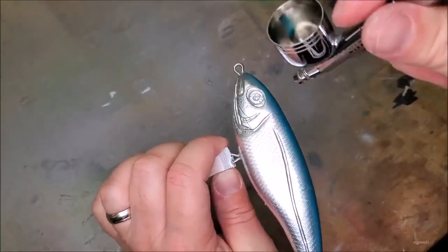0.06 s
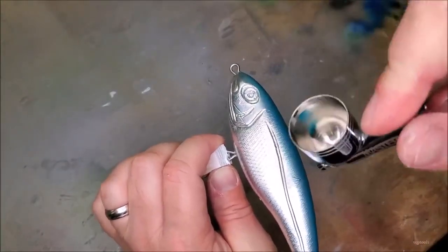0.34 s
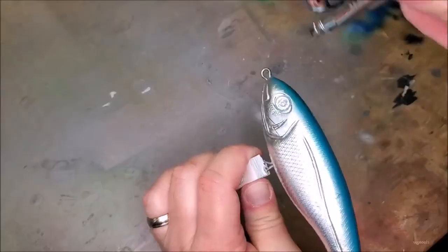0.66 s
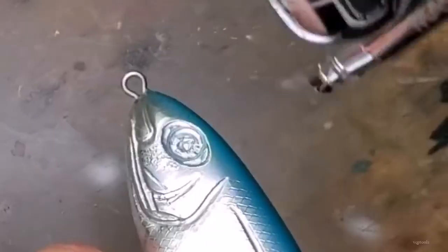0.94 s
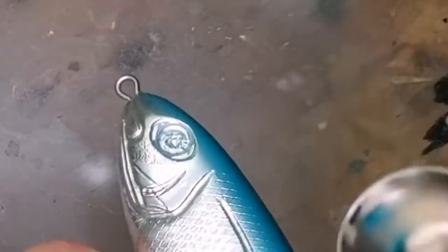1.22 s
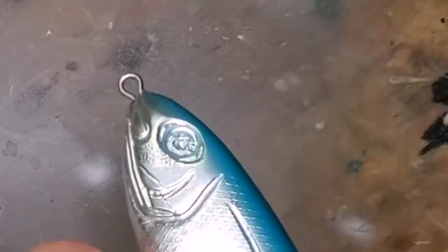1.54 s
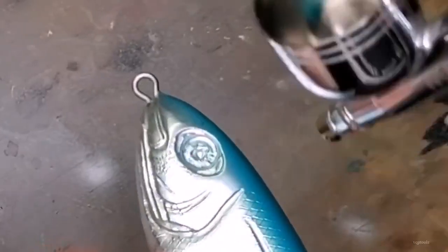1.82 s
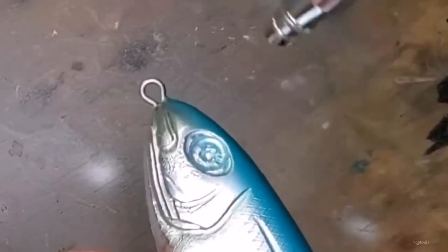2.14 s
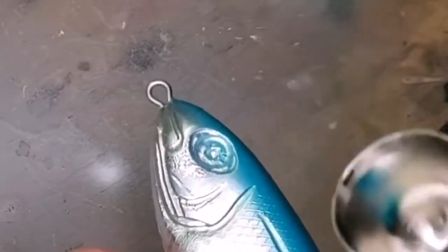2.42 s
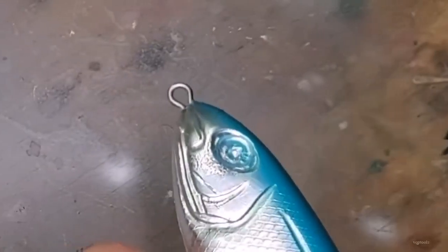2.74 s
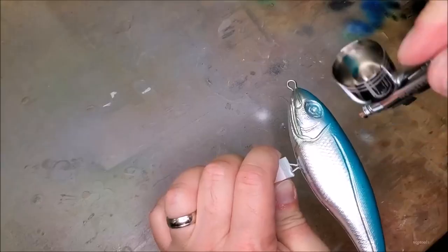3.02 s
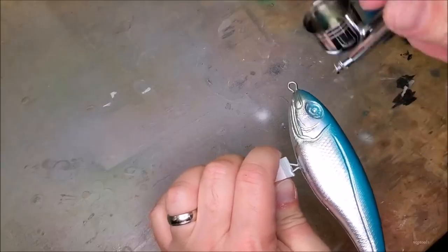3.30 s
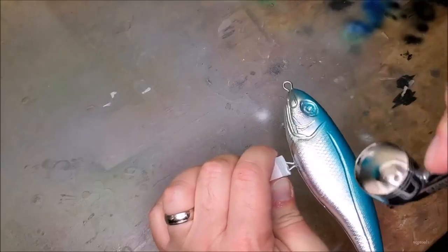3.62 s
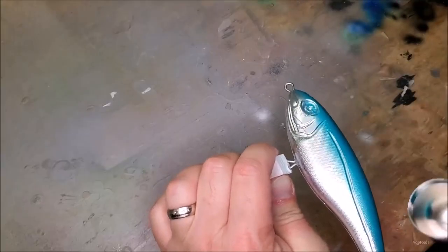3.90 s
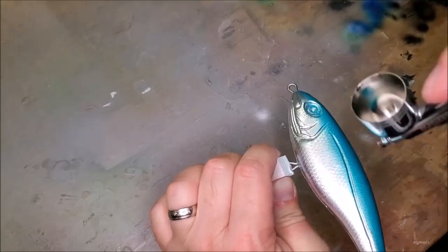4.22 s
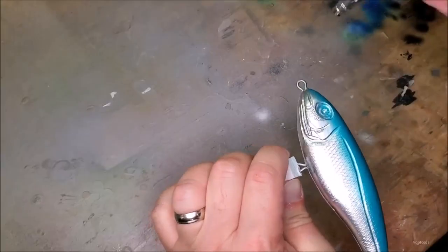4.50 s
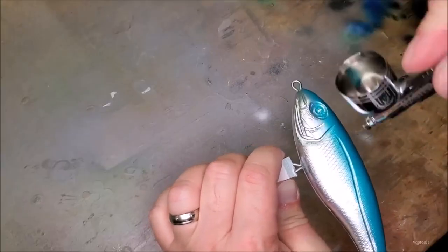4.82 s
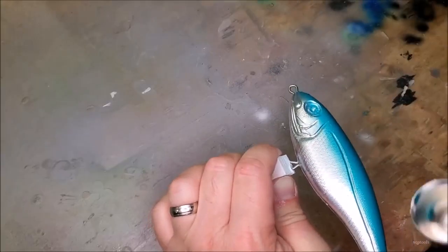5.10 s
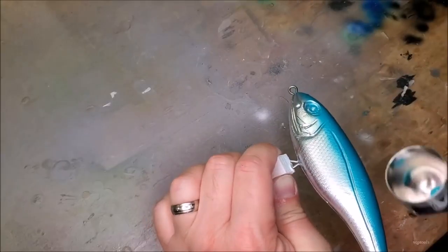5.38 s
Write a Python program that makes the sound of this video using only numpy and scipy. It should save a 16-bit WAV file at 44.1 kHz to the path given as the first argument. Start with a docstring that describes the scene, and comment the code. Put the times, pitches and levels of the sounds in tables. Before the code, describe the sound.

An airbrush sprays paint onto a fishing lure close to the microphone, in about nine short passes with brief gaps. Each one starts with a fine hiss of air, swells into a fuller, fluttering rush and shuts off. Now and then the hiss dips for an instant under a thin, high chirp. A fan hums faintly in the workshop, and everything sounds hollow and metallic.

```python
"""A close hiss comes in short passes: an airbrush is painting a fishing lure by the microphone.
Each press of the trigger lets out a fine hiss of air, then the fuller rush of the spray, which flutters
with turbulence. A fan hums behind. Now and then the whole hiss dips for an instant while thin tones ring.
Repeats two milliseconds apart give everything a hollow, metallic colour."""
import sys
import numpy as np
from scipy import signal
from scipy.fft import rfft, irfft
from scipy.io import wavfile

SR = 44100
rng = np.random.default_rng(int(sys.argv[2]) if len(sys.argv) > 2 else 0)


def dump(signal):
    """Clip the signal to [-1, 1] and save it as 16-bit WAV at the path in sys.argv[1]."""
    limited = np.clip(np.atleast_2d(signal).T, -1, 1)
    pcm = np.round(limited * 32767).astype(np.int16)
    wavfile.write(sys.argv[1], SR, pcm)


N = 244755
TIME = np.arange(N) / SR


def from_db(db):
    """Decibels to gain."""
    return 10 ** (np.asarray(db) / 20)


def rms_one(x):
    """Scale to unit power."""
    return x / np.sqrt(np.mean(x ** 2) + 1e-20)


def drift(rate):
    """A random wander of rms 1 that changes about rate times a second."""
    hz = np.arange(N // 2 + 1) * SR / N
    return rms_one(irfft(rfft(rng.standard_normal(N)) / (1 + (hz / rate) ** 2), N))


def noise(spectrum):
    """Noise of rms 1, shaped by rows of f/Hz, level/dB."""
    hz, db = np.transpose(spectrum)
    bins = np.maximum(np.arange(N // 2 + 1) * SR / N, 1)
    colour = from_db(np.interp(np.log(bins), np.log(hz), db))
    return rms_one(irfft(rfft(rng.standard_normal(N)) * colour, N))


def tone(hz, waver_hz, rate):
    """A sine of rms 1 whose pitch wanders a little."""
    return np.sqrt(2) * np.sin(2 * np.pi * np.cumsum(hz + waver_hz * drift(rate)) / SR)


def gate(start, end, rise_s, fall_s):
    """1 between start and end, dying away exponentially on both sides."""
    return np.exp(np.minimum(TIME - start, 0) / rise_s - np.maximum(TIME - end, 0) / fall_s)


def bump(t, half_width):
    """A smooth swell of height 1 around the time t."""
    return np.exp(-((TIME - t) / half_width) ** 2)


# Moving air of the fan, in the background: f/Hz, relative level/dB
FAN_SPECTRUM = [(30, -58.5), (130, -32), (230, -10), (300, -8), (400, -14.5), (500, -2), (650, -8),
                (930, -2), (1450, -6.5), (2000, -11), (2500, -27), (4000, -30.5), (6200, -48.5),
                (15000, -53)]

def fan_air():
    """The fan's faint, even rush behind the bench."""
    return from_db(-58) * noise(FAN_SPECTRUM)


# Hum of the same fan: f/Hz, level/dB
FAN_PARTIALS = [(480.1, -50.5), (651, -70), (904, -64.5), (960.2, -64.5), (1440.3, -69.5), (3068, -87),
                (4016, -92.5), (4963, -101.5)]

def fan_hum():
    """The fan hums with a few weak tones above its note, all wavering slightly."""
    hum = sum(from_db(db) * tone(hz, waver_hz=0.27, rate=4) for hz, db in FAN_PARTIALS)
    return from_db(0.82 * drift(19)) * hum


# Low puffs at the lure, mostly as a pass ends: t/s, half-width/s, level/dB
EDGE_PUFFS = [(1.002, 0.016, -41), (1.47, 0.0064, -43), (1.603, 0.03, -42.5), (2.672, 0.021, -44),
              (3.804, 0.014, -34), (5.155, 0.013, -23)]
# Their colour: f/Hz, relative level/dB
PUFF_SPECTRUM = [(280, -33), (430, -2), (600, 6.5), (1100, 8), (1600, 12), (2500, -20), (5000, -58)]

def puffs():
    """The jet grazes an edge and rustles lower for an instant."""
    return sum(from_db(db) * bump(t, width) for t, width, db in EDGE_PUFFS) * noise(PUFF_SPECTRUM)


# High cluster of tones, heard as the first pass dies: f/Hz, level/dB
CLUSTER_TONES = [(5570, -46), (7041, -64), (8570, -65), (10018, -65), (10530, -61), (11553, -58),
                 (12053, -54), (12548, -63), (13081, -60), (14500, -60)]
# The whole hiss dips while a thin tone rings: t/s, half-width/s, hiss gain/dB, tone f/Hz, tone level/dB
RINGING_DIPS = [(0.027, 0.015, -2, 2044, -37), (0.427, 0.012, -10.5, 2500, -66),
                (0.533, 0.0064, -9, 6460, -45), (0.57, 0.013, -29, 4630, -37),
                (0.623, 0.015, -1, 5570, -57), (0.635, 0.0086, -3, 4940, -38),
                (0.91, 0.011, 2.5, 4500, -47), (1.437, 0.0065, -11, 3016, -33.5),
                (1.582, 0.0066, -11, 2490, -40), (1.846, 0.01, -3.5, 2510, -38.5),
                (2.465, 0.0086, -4.5, 2520, -40), (2.986, 0.0094, -15, 2520, -33.5),
                (3.688, 0.008, -3, 2480, -44), (3.783, 0.019, -9.5, 2487, -40.5),
                (4.167, 0.014, -6, 4070, -36.5), (4.225, 0.0058, -9.5, 6420, -47),
                (4.27, 0.0089, -16.5, 5040, -47), (5.152, .015, -15, 2490, -65)]

def thin_tones(upper_count=5, top_hz=12950, fall_db_per_octave=8.5):
    """Brief, unsteady tones: one staggered cluster, and at each dip a tone with fainter ones above."""
    cluster_span_s = [0.546, 0.605]
    notes = [(*rng.normal(cluster_span_s, scale=0.021), hz, db) for hz, db in CLUSTER_TONES]
    for t, width, _, hz, db in RINGING_DIPS:
        notes.append((t - width, t + width, hz, db))
        for octaves in rng.random(upper_count) * np.log2(top_hz / hz):
            notes.append((t - width, t + width, hz * 2 ** octaves, db - 10 - fall_db_per_octave * octaves))
    waver_cycles = np.cumsum(12 * drift(39.6)) / SR
    out = np.zeros(N)
    for start, end, hz, db in notes:
        near = (TIME > start - 0.03) & (TIME < end + 0.03)
        sine = np.sqrt(2) * np.sin(2 * np.pi * (hz * TIME[near] + waver_cycles[near] + rng.random()))
        out[near] += from_db(db) * gate(start, end, rise_s=0.003, fall_s=0.002)[near] * sine
    return out


def dip_gain():
    """Gain of the whole hiss: it dips for an instant under nearly every thin tone."""
    return from_db(sum(db * bump(t, width) for t, width, db, _, _ in RINGING_DIPS))


# The nozzle from close up (body of the spray, its bright part, fine air hiss): f/Hz, relative level/dB
SPRAY_SPECTRUM = [(150, -57), (300, -58), (450, -39.5), (620, -30), (1000, -18), (1300, -9), (1600, -10.5),
                  (2000, -4.5), (2350, -8), (2500, 1.5), (2680, -4.5), (3000, -2.5), (3300, -9),
                  (4300, -36)]
BRIGHT_SPECTRUM = [(1000, -52), (2900, -25.5), (3500, 0.5), (4000, -0.5), (4500, 1), (5100, -2.5),
                   (5550, -6), (6000, -16.5), (6500, -12.5), (7050, -19.5), (8000, -32)]
AIR_SPECTRUM = [(300, -48), (600, -6), (1500, 4.5), (4000, 9.5), (6500, 3), (7500, 0.5), (9300, -4.5),
                (10100, 0), (12000, -0.5), (13600, -1.5), (15500, -6)]
# The spray surges or sags: t/s, half-width/s, gain/dB
SPRAY_SURGES = [(0.533, 0.021, -7), (.74, .01, 0.5), (0.885, 0.0071, 7.5), (2.857, 0.024, 2.5),
                (3.239, 0.011, 9), (4.129, 0.021, 7.5), (4.184, 0.013, 8), (5.175, 0.0041, 10),
                (5.349, 0.027, -8.5)]
# One row per press: start t/s, end t/s, swell/s, first flow re full/dB, spray level/dB, trend/(dB/s),
# bright part re spray/dB, then the fine hiss: steady level/dB, opening level/dB, closing level/dB
TRIGGER_PRESSES = [(0, 0.58, 0.073, 2, -34, -1.5, -3.5, -44, -51, -50),
                   (0.599, 0.639, 0.027, -15, -39, 0, -5, -45, -56.5, -69),
                   (0.644, 0.776, .003, -7, -29.5, 5, -5.5, -52, -64, -62),
                   (0.86, 1.479, 0.1, -22, -30.5, -4.5, -4, -51, -84, -49),
                   (1.562, 2.077, 0.047, -20, -32, -2, -4, -49.5, -68, -47.5),
                   (2.163, 2.691, 0.059, -16.5, -32.5, 2.5, -3, -58, -50, -49),
                   (2.778, 3.264, 0.055, -7.5, -33.5, -10.5, -3, -55.5, -56, -47),
                   (3.348, 3.82, 0.034, -19, -35, 3, -1, -52, -52, -46),
                   (4.055, 4.537, 0.068, -10.5, -35, 3.5, -1, -53.5, -46.5, -48),
                   (4.675, 5.189, 0.1, -28, -34, 3, -1.5, -54.5, -46, -42),
                   (5.308, 5.6, 0.067, -13.5, -33, 14, 0, -54, -46.5, -76)]

def airbrush(shut_s=0.036, shut_db=-27):
    """Each press swells to full flow, holds and shuts; turbulence makes the jet flutter."""
    spray_gain, bright_gain, air_gain = np.zeros((3, N))
    for press in TRIGGER_PRESSES:
        start, end, swell_s, first_db, spray_db, trend, bright_db, air_db, opening_db, closing_db = press
        held = np.clip(TIME, start, end)
        swell_db = first_db * np.clip(1 - (held - start) / swell_s, 0, 1) ** 2
        release = np.clip(1 - (end - held) / shut_s, 0, 1) ** 2   # the finger lets the trigger up
        valve = gate(start, end, rise_s=0.0023, fall_s=0.0079) * from_db(shut_db * release)
        flow = valve * from_db(spray_db + swell_db + trend * (held - (start + end) / 2))
        spray_gain += flow
        bright_gain += flow * from_db(bright_db)
        # the half-open valve hisses finer, at both ends of the pass
        opening = from_db(opening_db) * bump(start + swell_s, half_width=0.067)
        closing = from_db(closing_db) * bump(end - 0.037, half_width=0.065)
        air_flow = valve * from_db(0.59 * swell_db)   # a shallower swell: air leads the spray
        air_gain += air_flow * (from_db(air_db) + opening + closing)
    flutter = drift(35)
    spray = spray_gain * from_db(1.4 * flutter) * noise(SPRAY_SPECTRUM)
    bright = bright_gain * from_db(-1.18 + 0.49 * flutter) * noise(BRIGHT_SPECTRUM)
    air = air_gain * from_db(3.5 + 1.4 * flutter) * noise(AIR_SPECTRUM)
    surge_db = sum(db * bump(t, width) for t, width, db in SPRAY_SURGES)
    return (spray + bright) * from_db(surge_db) + air


def workshop(x, echo_db=-11.5, t60_s=0.093):
    """Bench and walls send a short, weak spatter of echoes back to the microphone."""
    age = TIME[:SR // 5]
    echoes = rng.standard_normal(len(age)) * from_db(-60 * age / t60_s)
    return x + from_db(echo_db) * signal.fftconvolve(x, echoes / np.linalg.norm(echoes))[:N]


def scene():
    """One microphone, airbrush close and fan behind; the tones hold while the hiss dips."""
    hiss = workshop(airbrush() + puffs()) + fan_air()
    return (hiss * dip_gain() + thin_tones() + fan_hum())[None]


def hollow(x, delay_s=0.002, share=0.49, count=4):
    """A short repeat, itself repeated: broad peaks every 500 Hz with deep notches between them."""
    repeat = np.zeros(round(delay_s * SR) + 1)
    repeat[0], repeat[-1] = 1, share
    echoes = np.ones(1)
    for _ in range(count):
        echoes = np.convolve(echoes, repeat)
    return signal.lfilter(echoes / np.linalg.norm(echoes), [1], x)


# Overall level, falling silent for a moment; the end values hold before and after: t/s, gain/dB
DROPOUT_CURVE = [(.619, -2.5), (.631, -20), (0.638, -14), (0.643, -59), (0.653, -31), (0.656, -1.5)]

def record(dry, cutoff_hz=15680):
    """The sound drops out once, briefly; it is coloured hollow and the top is cut."""
    t, db = np.transpose(DROPOUT_CURVE)
    interrupted = dry * from_db(np.interp(TIME, t, db))
    top_cut = signal.ellip(14, 0.1, 90, cutoff_hz, fs=SR, output="sos")
    return signal.sosfilt(top_cut, hollow(interrupted))


dry = scene()
out = record(dry)
dump(out)
```